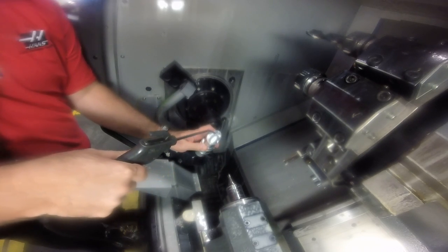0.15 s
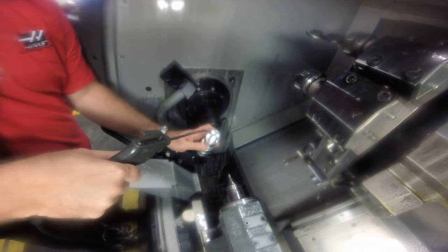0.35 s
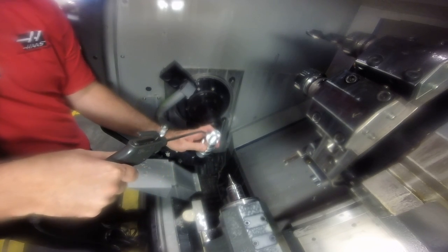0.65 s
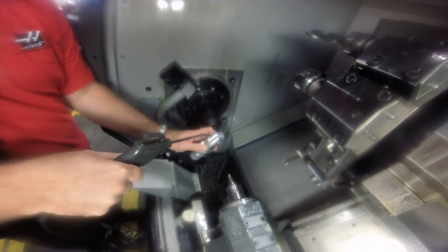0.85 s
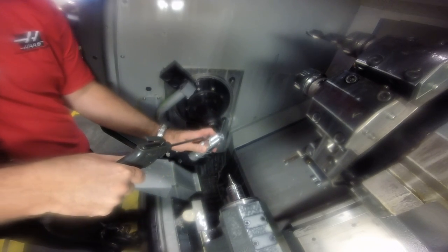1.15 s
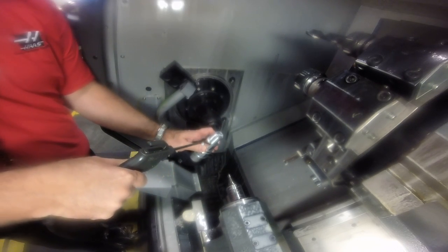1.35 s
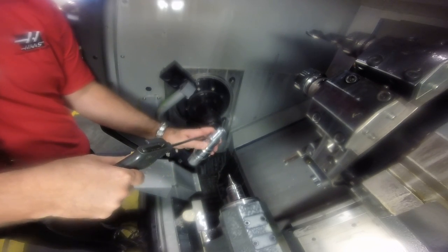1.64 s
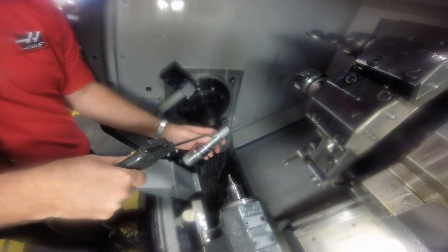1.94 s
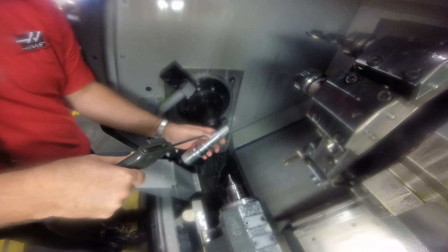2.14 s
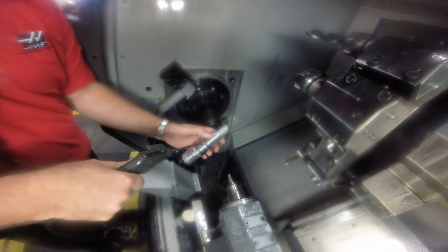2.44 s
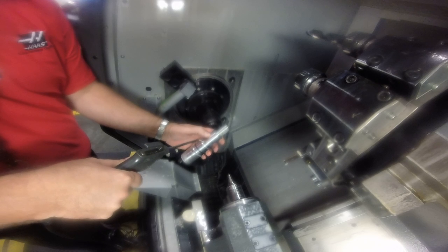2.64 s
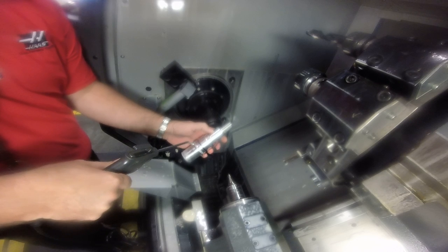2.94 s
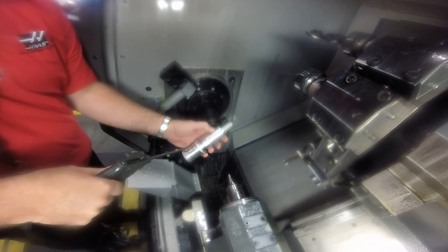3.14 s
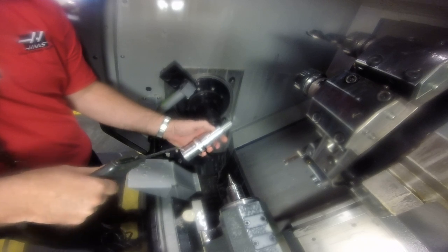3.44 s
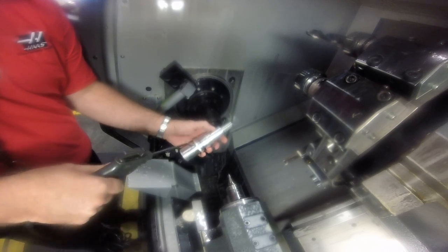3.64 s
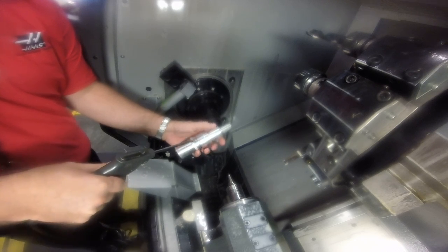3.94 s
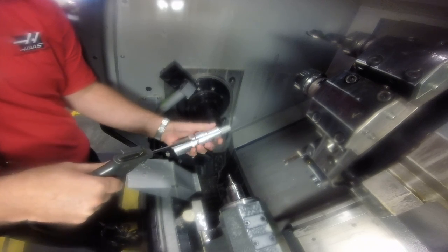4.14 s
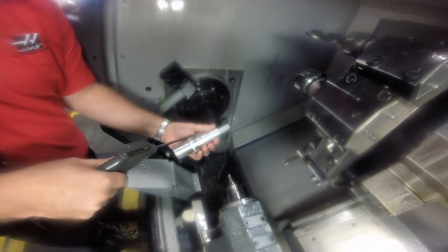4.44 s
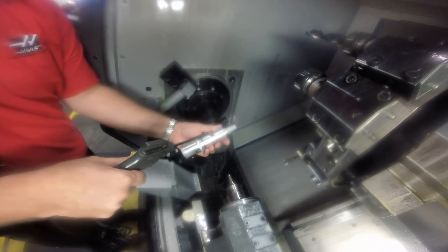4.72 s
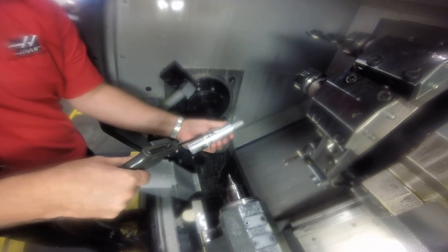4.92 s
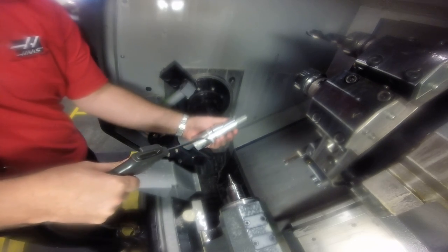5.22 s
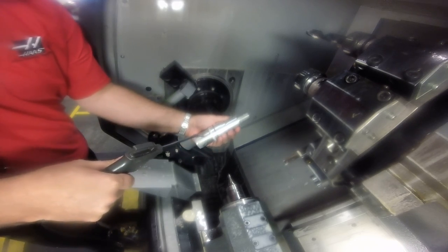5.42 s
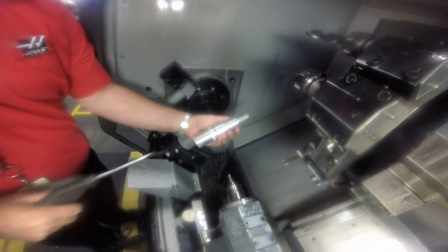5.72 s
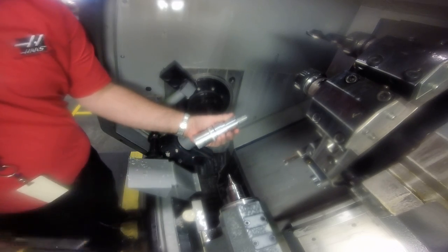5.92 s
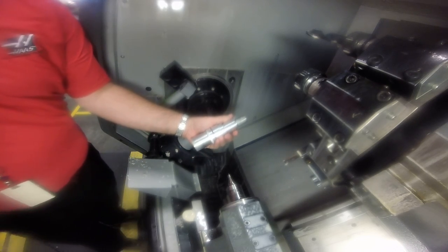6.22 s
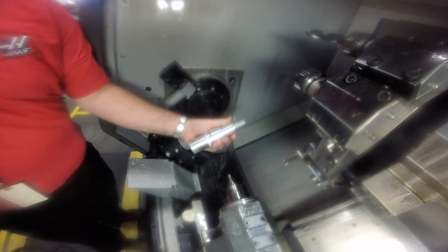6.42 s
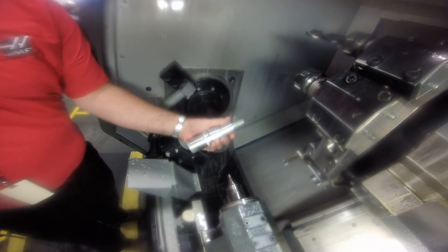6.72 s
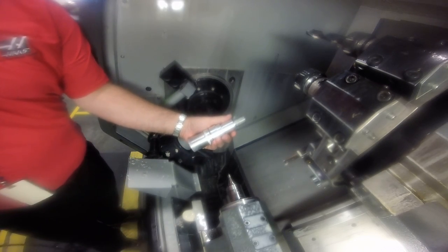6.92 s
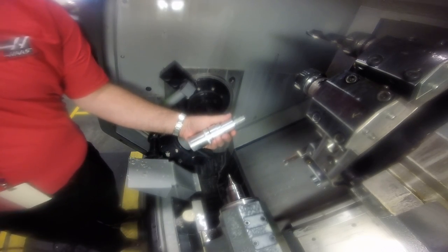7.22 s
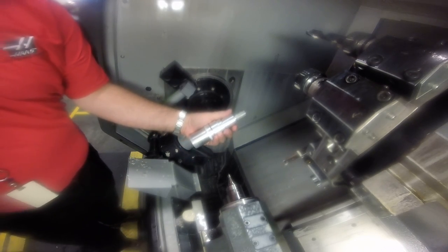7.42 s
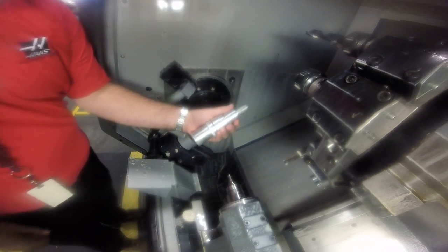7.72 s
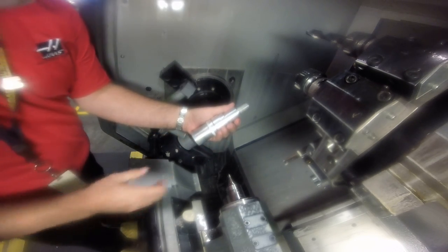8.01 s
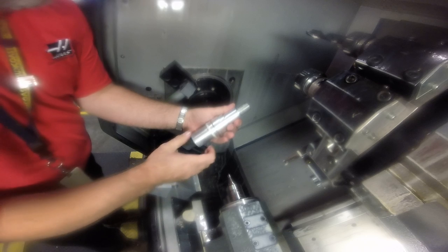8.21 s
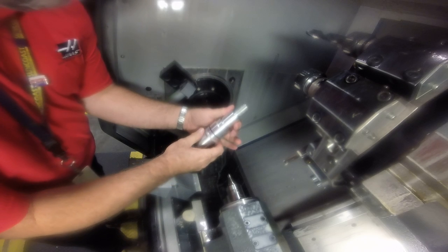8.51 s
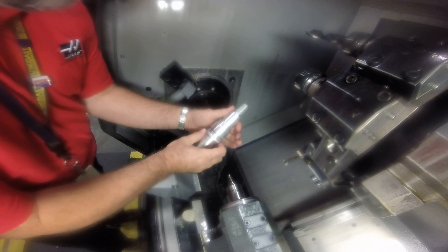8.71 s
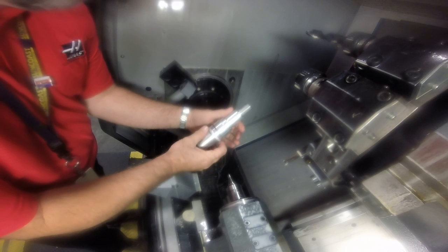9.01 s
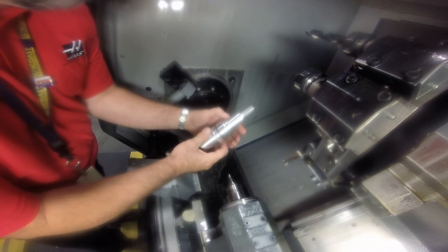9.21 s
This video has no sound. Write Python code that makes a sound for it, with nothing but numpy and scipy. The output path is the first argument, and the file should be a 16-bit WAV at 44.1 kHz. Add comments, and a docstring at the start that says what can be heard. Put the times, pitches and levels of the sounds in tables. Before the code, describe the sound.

An air gun blows a metal part clean in two long, harsh hissing blasts, then booming knocks and small metallic clinks follow over low machine hum.

```python
"""In a lathe's steel cabinet, close up, an air gun blows chips off a turned part in two long blasts.
Each blast is jet noise in three bands; it flares as the jet crosses edges and whistles on holes.
Then the gun is hung up: damped modes boom in the cabinet wall and ring in the grip; noise bursts rattle,
clink and tick. Hum lines, a low drone and fan noise run throughout.
The mono camera microphone sits on the cabinet; its limiter ducks on peaks and recovers slowly."""
import sys
import numpy as np
from scipy import signal
from scipy.fft import rfft, irfft, next_fast_len
from scipy.io import wavfile
from scipy.ndimage import uniform_filter1d, minimum_filter1d, map_coordinates

SR = 44100
rng = np.random.default_rng(int(sys.argv[2]) if len(sys.argv) > 2 else 0)


def int16_out(signal):
    """Quantize to a 16-bit WAV file."""
    q = np.round(np.clip(np.atleast_2d(signal).T, -1, 1) * 32767)
    wavfile.write(sys.argv[1], SR, q.astype(np.int16))


N = 412776

# Machine: motor and mains lines (frequency [Hz], level [dB rms])
HUM_LINES = [(89.5, -76), (119.7, -38.5), (165, -65), (255.5, -60.5), (360, -64), (386, -62), (770, -73.5)]
# Drone of the cabinet, before its treble roll-off (frequency [Hz], relative density [dB per Hz])
DRONE_COLOUR = [(20, -35.5), (45, -10.5), (70, -14), (88, 0), (104, -8), (125, -7.5), (142, -7.5), (163, 3),
                (185, -8.5), (215, -21.5), (300, -25.5), (500, -39)]
# Rush of the fans (frequency [Hz], relative density [dB per Hz])
FAN_COLOUR = [(200, -30), (430, -9), (750, -10.5), (1000, -14), (1500, -13), (2200, -16), (2900, -15.5),
              (3500, -18.5), (4800, -26), (6000, -26.5), (8000, -29), (11000, -36.5), (14000, -41.5),
              (15300, -49.5)]
# The cabinet's colour on the fans (frequency [Hz], width [Hz], lift or dip [dB])
FAN_RESONANCES = [(1505, 200, 3), (2670, 190, 5.5), (3144, 101, -6.5), (5900, 180, 5), (7960, 400, 0.5)]

# Jet noise before resonances and bass cut (frequency [Hz], relative density [dB per Hz])
JET_COLOUR = [(450, -31), (900, -30.5), (1150, -24.5), (1400, -13.5), (2000, -10.5), (2700, -5),
              (3600, -6.5), (4700, -13), (5250, -13), (5800, -3), (9000, -7), (11800, -15), (12600, -19.5),
              (15200, -21.5)]
# Resonances that colour the hiss (frequency [Hz], width [Hz], lift [dB])
CAVITY_RESONANCES = [(445, 35, 4.9), (755, 94, 7.2), (947, 69, 6.7), (1048, 35, 5.2), (1338, 265, 4.1),
                     (2032, 35, 2.6), (2705, 64, 4.9), (2959, 44, 5.7), (3047, 38, 5.7), (3333, 85, 4.1),
                     (4167, 57, 3.0), (4262, 156, 4.1), (5898, 67, 2.8), (6592, 48, 2.9), (8031, 48, 2.8),
                     (8232, 299, 2.6), (9103, 204, 3.9), (9324, 183, 3.2), (11766, 83, 2.5),
                     (13650, 283, 2.7)]
# The trigger is squeezed and let go (press [s], release [s])
SQUEEZES = [(-.3, 1.812), (1.998, 5.715)]
VALVE_OPEN_S, VALVE_CLOSE_S = 0.049, .05  # time constants of opening and shutting
# Aim drifting over the part, one curve per blast (time [s], roar level [dB], hiss level [dB], sizzle level [dB])
AIM_CURVES = [
    [(0, -34.5, -30, -32.5), (0.18, -33.5, -27.5, -30.5), (0.4, -33.5, -29.5, -33), (1.0, -34.5, -30, -33),
     (1.3, -33.0, -29.5, -33.5), (1.45, -31.5, -27.5, -35.5), (1.82, -32, -29.5, -34.5)],
    [(2.05, -31.5, -26, -31), (2.32, -30.5, -28.5, -33), (2.42, -32, -31, -36.5), (2.75, -32.0, -31, -37),
     (3.04, -30.5, -27.0, -36.0), (3.22, -33.5, -32, -36.5), (3.67, -30.0, -30.0, -36.5),
     (3.75, -29.0, -23.5, -31.5), (3.93, -30.0, -28.0, -35.5), (4.28, -28.5, -25.0, -34),
     (4.45, -32, -29.5, -34.5), (4.85, -28.0, -28, -34.5), (5.02, -27.5, -24, -29),
     (5.14, -30.5, -29, -36.5), (5.31, -28, -24.5, -34.5), (5.48, -30.5, -27.0, -33.5),
     (5.72, -31.0, -29.5, -36)],
]
# Roar, hiss and sizzle, a row each
# (power of valve opening [-], swing with the wrist [dB], share of a gust's brightness [-])
EDDY_SIZES = [(.85, 0.26, -0.995), (1.05, 0.8, 0.22), (1.3, 1.7, 0.58)]
# At first the wrist wags the jet across the end of the part
WAG_PERIOD_S, WAG_PEAK_S, WAG_UNTIL_S = 0.1503, .297, 1.2
# The jet crosses an edge and flares (time [s], length [s], lift [dB], brightness [dB])
EDGE_GUSTS = [(0.291, 0.014, 5.5, 2.5), (1.051, 0.047, 2, -2), (2.981, 0.021, 7, -2.5),
              (3.375, 0.069, 2.5, -3), (3.523, 0.034, 3.5, -1.5), (3.826, 0.025, 3.5, -1),
              (5.03, 0.052, 1.5, 0.1), (5.232, 0.03, 2.5, -1)]
# The jet rests on a hole and whistles (time [s], length [s], level [dB], centre [Hz])
HOLE_WHISTLES = [(.16, 0.099, -32.5, 10600), (.287, 0.032, -30, 13600), (2.62, .16, -40, 3330),
                 (3.1, .16, -40, 3376), (3.38, 0.033, -33, 2350), (3.68, 0.054, -29.5, 2880),
                 (4.66, .04, -32, 2570), (5.022, .05, -24.5, 6400), (5.238, 0.035, -26, 2380),
                 (5.28, 0.13, -29.5, 5830)]
WHISTLE_SPREAD = .0045  # width times length [octave seconds]: the longer it lasts, the purer the note
# Faint whistles that come and go by chance
STRAY_DB, STRAY_S, STRAY_LOW_HZ, STRAY_HIGH_HZ = -43, .11, 2400, 4300
# The cabinet's echo (frequency [Hz], t60 [s])
CABINET_DECAY = [(200, 0.36), (3000, 0.72), (7000, 0.5), (14000, 0.34)]

# Knocks on the wall, with the gun's second bounce at 6.818 s (time [s], thump level [dB], swell [s], change of
# the deepest modes [dB])
WALL_KNOCKS = [(6.368, -12, .017, -2.5), (6.536, -21.5, .0067, 7), (6.738, -3, .0047, -11.5),
               (6.818, -16.5, .0052, -14.5), (7.239, -10, .0056, 15), (7.26, 0.5, 0.0067, -4.5),
               (7.277, 2, 0.0082, -2.5), (7.371, -6, .009, 9), (7.413, 7, 0.0099, -0.5),
               (7.619, 6, .011, -.5), (7.737, -5, .017, -3.5), (7.799, 1, 0.013, -2.5),
               (8.141, -8, .017, -4.5)]
# The wall's modes (frequency [Hz], relative level [dB], t60 [s])
WALL_MODES = [(70.9, -13.5, 0.33), (86.26, -7, 0.63), (95.2, -15, 0.49), (117.16, -13, 0.44),
              (147.6, -11.5, 0.29), (153.2, 2, 0.19), (164.6, -4.5, 0.32), (190, -16.5, 0.26),
              (238, -25.5, 0.13), (284, -30.5, .08)]
REBOUND_S, REBOUND_DB = 0.04504, -14  # the gun bounces back after every knock; after the knock at 6.738 s it bounces a second time, at 6.818 s
# The gun's hollow grip (frequency [Hz], relative level [dB], t60 [s])
GRIP_MODES = [(385, -3, 0.099), (440, -2.5, 0.09), (500, 1.5, 0.07), (584, -4, 0.056), (740, -13, 0.049),
              (860, -16.5, 0.037), (995, -5.5, 0.051), (1165, -15, 0.054), (1340, -15, .05)]
# The grip itself is struck (time [s], level [dB])
GRIP_STRIKES = [(6.536, -27), (6.738, -28), (7.275, -24), (7.426, -19), (7.619, -37.5)]
GRIP_SHAKE_DB, LEVER_SHAKE_DB = -40, -46  # how much a knock stirs grip and lever, relative to its thump
# The loose lever is jolted (time [s], level [dB])
JOLTS = [(6.738, -25), (7.239, -23.5), (7.371, -28.5), (7.413, -32)]
# The loose lever's rattle (frequency [Hz], relative density [dB per Hz])
RATTLE_COLOUR = [(200, -10), (450, 1.5), (750, -8.5), (1000, -3), (1250, -9), (1480, 2), (1850, -8.5),
                 (2350, -1.5), (3100, -16), (4200, -25), (5200, -33), (9500, -40), (12000, -63)]
# The hook and fittings touch (time [s], level before the attack [dB], t60 [s])
CLINK_TIMES = [(6.739, -47, 0.08), (7.551, -43.5, .14), (7.612, -37, .12), (7.624, -40, 0.2),
               (7.748, -51, 0.098), (7.828, -46.5, 0.12), (8.149, -59, .1)]
# Clinking fittings (frequency [Hz], relative density [dB per Hz])
FITTING_COLOUR = [(900, -41.5), (1850, -23), (2250, 7), (2750, -2.5), (3600, -8.5), (5300, -18), (6000, -6),
                  (7500, -10), (9400, -11), (10500, -30), (11500, -17.5), (14000, -41)]
# Dry ticks as the hook seats (time [s], level before the attack [dB], t60 [s])
HOOK_SNAPS = [(7.439, -15.5, .018), (7.470, -38, .01)]
# Hook ticks (frequency [Hz], relative density [dB per Hz])
SNAP_COLOUR = [(300, -15), (1900, 0), (4000, -6), (7500, -17), (11000, -42)]

TOP_HZ = 15330  # the camera's band limit


def amp(db):
    """Decibels to gain."""
    return 10 ** (np.asarray(db) / 20)


def unit(x):
    """Scaled to rms 1."""
    return x / np.sqrt(np.mean(x ** 2) + 1e-20)


def along(points, hz):
    """(Hz, value) points read on a log frequency axis."""
    f, v = np.transpose(points)
    return np.interp(np.log(hz + 1), np.log(f + 1), v)


def bumps(resonances, hz):
    """The lift in dB from (Hz, width Hz, dB) resonances."""
    return sum(db / (1 + (2 * (hz - centre) / width) ** 2) for centre, width, db in resonances)


def clock():
    """The time of every sample, in seconds."""
    return np.arange(N) / SR


def wobble(rate):
    """A smooth random curve of rms 1, rate knots a second."""
    knots = rng.standard_normal(int(N * rate / SR) + 4)
    return unit(map_coordinates(knots, [np.arange(N) * rate / SR]))


def filtered(x, response):
    """x filtered by a response of frequency."""
    size = next_fast_len(N + SR // 2)
    spectrum = rfft(x, size) * response(np.fft.rfftfreq(size, 1 / SR))
    return irfft(spectrum, size)[:N]


def noise(response):
    """Noise of rms 1 with the given response."""
    return unit(filtered(rng.standard_normal(N), response))


def add(track, s, sound):
    """Mix a sound into the track at s seconds."""
    part = track[round(s * SR):][:len(sound)]
    part += sound[:len(part)]


def swell(s, length):
    """A smooth rise and fall, 1 at s seconds and 0.61 half a length to either side."""
    return np.exp(-.5 * np.minimum((2 * (clock() - s) / length) ** 2, 100))


def bursts(rows, spectrum, attack):
    """Noise of one colour, struck at each (s, dB, t60) and dying away."""
    level, t = np.zeros(N), np.arange(SR // 2) / SR
    for s, db, t60 in rows:
        add(level, s, amp(db - 60 * t / t60) * (1 - np.exp(-t / attack)))
    return level * noise(lambda hz: amp(along(spectrum, hz)))


def ringing(modes, t, scatter_db):
    """Damped (Hz, dB, t60) modes, struck at slightly new strengths."""
    total = 0
    for hz, db, t60 in modes:
        level_db = db + rng.normal(0, scatter_db) - 60 * t / t60
        total = total + amp(level_db) * np.sin(2 * np.pi * hz * t)
    return total


def machine(drone_db=-42.5, fans_db=-57.5, waver_db=1.0, drift_rad=0.29):
    """Hum lines, slightly unsteady in level and phase, over the droning cabinet and the rush of fans."""
    t, hum = clock(), np.zeros(N)
    for hz, db in HUM_LINES:
        level = amp(db + waver_db * wobble(4.6)) * np.sqrt(2)  # rms to peak
        hum += level * np.sin(2 * np.pi * hz * t + drift_rad * wobble(2.2))
    drone = noise(lambda hz: amp(along(DRONE_COLOUR, hz)) / (1 + (hz / 600) ** 4))
    fans = noise(lambda hz: amp(along(FAN_COLOUR, hz) + bumps(FAN_RESONANCES, hz)))
    return hum + amp(drone_db) * drone + amp(fans_db) * fans


def valve(press, release):
    """The valve's opening, 0 to 1: it eases open and snaps shut ever faster."""
    t = clock()
    opening = 1 - np.exp(-np.maximum(t - press, 0) / VALVE_OPEN_S)
    closing = np.exp(-(np.maximum(t - release, 0) / VALVE_CLOSE_S) ** 2)
    return opening * closing


def eddy_levels():
    """The strength of roar, hiss and sizzle: set by valve and aim, swung by the wrist, lifted by gusts."""
    t, levels = clock(), []
    wag = np.cos(2 * np.pi * (t - WAG_PEAK_S) / WAG_PERIOD_S) * (t < WAG_UNTIL_S)
    gusts = [(swell(s, length), db, bright_db) for s, length, db, bright_db in EDGE_GUSTS]
    blasts = [(valve(*squeeze), np.transpose(aim)) for squeeze, aim in zip(SQUEEZES, AIM_CURVES)]
    for k, (power, wag_db, share) in enumerate(EDDY_SIZES):
        flow = sum(opening ** power * amp(np.interp(t, s, aim_db[k])) for opening, (s, *aim_db) in blasts)
        gust_db = sum(shape * (db + share * bright_db) for shape, db, bright_db in gusts)
        levels.append(flow * amp(wag_db * wag + gust_db))
    return levels


def jet_colour(hz):
    """Broad jet noise, lifted at the cavity resonances and empty in the bass."""
    bass_cut = hz ** 2 / (hz ** 2 + 250 ** 2)
    return amp(along(JET_COLOUR, hz) + bumps(CAVITY_RESONANCES, hz)) * bass_cut


def air_gun(roar_hz=4900, sizzle_hz=10300, flutter_db=.5, sputter_db=0.43, tremor_db=.5):
    """Large eddies roar off the part, smaller ones hiss, the finest sizzle at the nozzle."""
    below = lambda hz, edge: 1 / (1 + (hz / edge) ** 20)  # share of power under the edge
    roar = noise(lambda hz: jet_colour(hz) * np.sqrt(below(hz, roar_hz)))
    hiss = noise(lambda hz: jet_colour(hz) * np.sqrt((1 - below(hz, roar_hz)) * below(hz, sizzle_hz)))
    sizzle = noise(lambda hz: jet_colour(hz) * np.sqrt(1 - below(hz, sizzle_hz)))
    # each eddy size flutters on its own; the whole jet sputters faster and wavers with the hand
    jet = np.zeros(N)
    for level, eddy in zip(eddy_levels(), [roar, hiss, sizzle]):
        jet += level * eddy * amp(flutter_db * wobble(35))
    return jet * amp(sputter_db * wobble(130) + tremor_db * wobble(12))


def whistle(s, length, db, centre_hz):
    """A hole in the jet briefly sings in a band of its own."""
    octaves = WHISTLE_SPREAD / length
    peak = lambda hz: np.exp(-.5 * (np.log2((hz + 1) / centre_hz) / octaves) ** 2)
    band = noise(lambda hz: jet_colour(hz) * peak(hz))
    return amp(db) * swell(s, length) * band


def whistles(count=6):
    """The strong whistles and some faint stray ones, for as long as air flows."""
    last_release = SQUEEZES[-1][1]
    strays = []
    for when, pitch in rng.random((count, 2)):
        centre_hz = STRAY_LOW_HZ * (STRAY_HIGH_HZ / STRAY_LOW_HZ) ** pitch
        strays.append((when * last_release, STRAY_S, STRAY_DB, centre_hz))
    air_flow = sum(valve(*squeeze) for squeeze in SQUEEZES)
    return air_flow * sum(whistle(*row) for row in list(HOLE_WHISTLES) + strays)


def near_walls(x, strength=.11, reach_s=.012, count=14):
    """Close steel returns quick copies; as the hands move each fades in and out, shifting the ripple."""
    out = x.copy()  # the direct sound
    for delay in rng.uniform(.001, reach_s, count):
        out += strength * wobble(2.496) * np.pad(x, (int(delay * SR), 0))[:N]
    return out / np.sqrt(1 + count * strength ** 2)


def cabinet(x):
    """The enclosure's echo: a noise tail in which each frequency dies at its own speed."""
    hz, t, z = signal.stft(rng.standard_normal(SR), SR, nperseg=256)
    decay = amp(-60 * t / along(CABINET_DECAY, hz)[:, None])
    tail = signal.istft(z * decay, SR, nperseg=256)[1]
    return signal.fftconvolve(x, tail / np.linalg.norm(tail))[:N]


def knocks(sway_hz=105):
    """Each knock booms the sheet steel and rebounds; contact sets the swell and the deepest modes' share."""
    out, t = np.zeros(N), np.arange(SR) / SR
    for s, db, swell_s, sway_db in WALL_KNOCKS:
        panel = [(hz, level + sway_db * (hz < sway_hz), t60) for hz, level, t60 in WALL_MODES]
        boom = ringing(panel, t, scatter_db=.5) * (1 - np.exp(-(t / swell_s) ** 2))
        add(out, s, amp(db) * boom)
        add(out, s + REBOUND_S, amp(db + REBOUND_DB) * boom)
    return out


def grip():
    """The hollow grip rings faintly at every knock and clearly when it is struck itself."""
    out, t = np.zeros(N), np.arange(SR // 2) / SR
    shakes = [(s, db + GRIP_SHAKE_DB) for s, db, *_ in WALL_KNOCKS]
    for s, db in shakes + list(GRIP_STRIKES):
        add(out, s, amp(db) * ringing(GRIP_MODES, t, scatter_db=2) * (1 - np.exp(-t / .004)))
    return out


def mount(x, edge_hz=52):
    """The camera's mount passes little of the wall's slowest motion."""
    return signal.sosfilt(signal.butter(3, edge_hz, "highpass", fs=SR, output="sos"), x)


def hardware(rattle_t60=0.11):
    """The gun's loose lever rattles at each knock and jolt, its fittings clink and the hook snaps home."""
    shakes = [(s, db + LEVER_SHAKE_DB) for s, db, *_ in WALL_KNOCKS] + list(JOLTS)
    rattle = bursts([(s, db, rattle_t60) for s, db in shakes], RATTLE_COLOUR, attack=0.0058)
    clinks = bursts(CLINK_TIMES, FITTING_COLOUR, attack=.0012)
    snaps = bursts(HOOK_SNAPS, SNAP_COLOUR, attack=.0006)
    return rattle + clinks + snaps


def scene():
    """Airborne sounds echo in the cabinet; booms and grip reach the camera microphone through the steel."""
    air = near_walls(air_gun() + whistles()) + hardware()
    through_steel = mount(knocks() + grip())
    mono = air + amp(-17.5) * cabinet(air) + through_steel + machine()
    return np.array([mono, mono])


def limiter(x, ceiling=0.76, release_db=11):
    """The gain drops on a peak, eased over a few milliseconds, and creeps back at release_db a second."""
    over_db = 20 * np.log10(np.maximum(np.abs(x).max(axis=0) / ceiling, 1))
    creep = release_db * clock()
    cut_db = np.maximum.accumulate(over_db + creep) - creep
    gain = minimum_filter1d(amp(-cut_db), size=129)
    return x * uniform_filter1d(gain, size=129)


def record(dry):
    """The camera limits the peaks and keeps nothing above its band limit."""
    band = lambda hz: np.clip((TOP_HZ - hz) / 150 + .5, 0, 1)  # a slope 150 Hz wide
    return np.array([filtered(channel, band) for channel in limiter(dry)])


dry = scene()
out = record(dry)
int16_out(out)
```